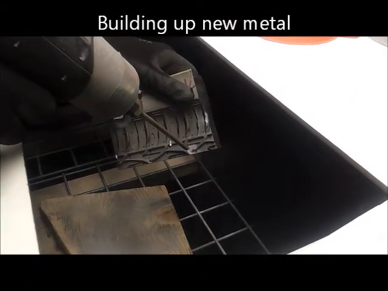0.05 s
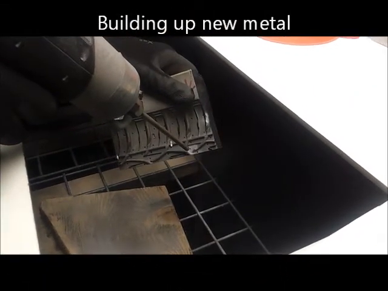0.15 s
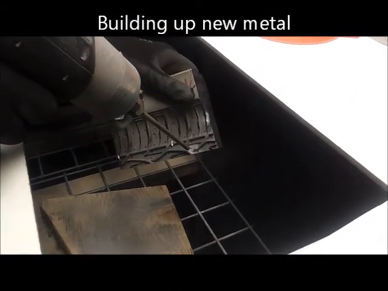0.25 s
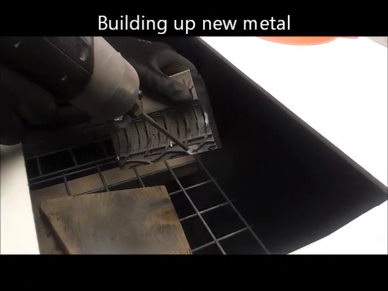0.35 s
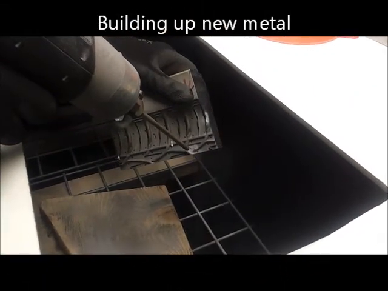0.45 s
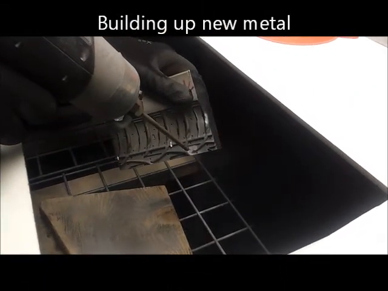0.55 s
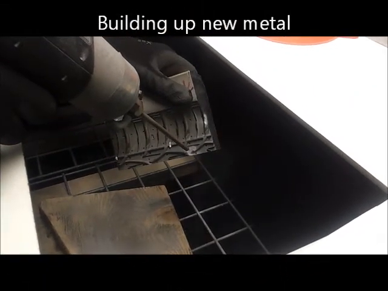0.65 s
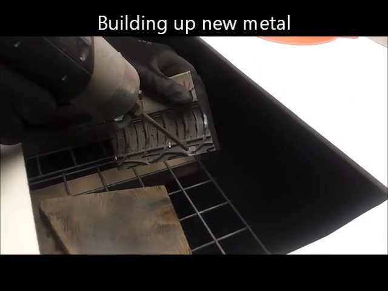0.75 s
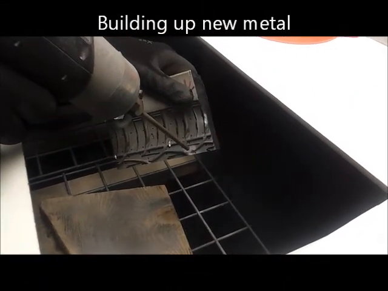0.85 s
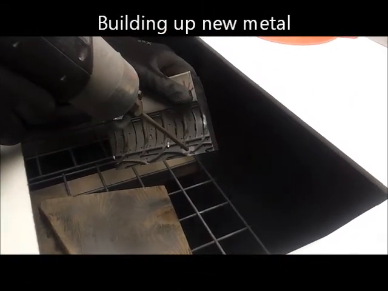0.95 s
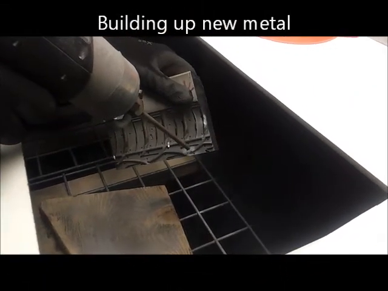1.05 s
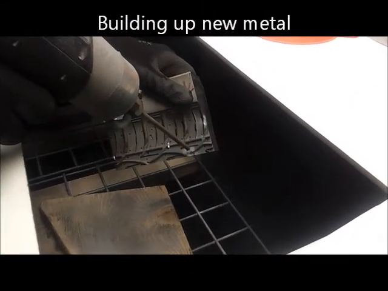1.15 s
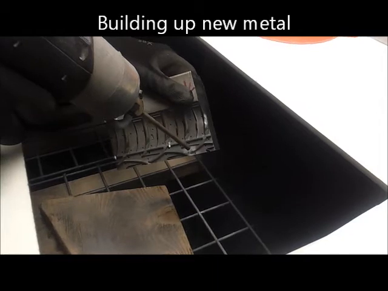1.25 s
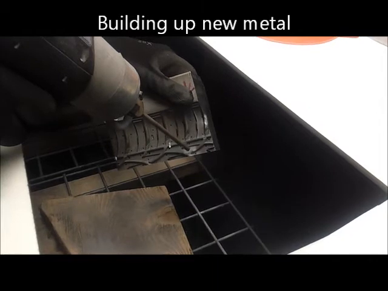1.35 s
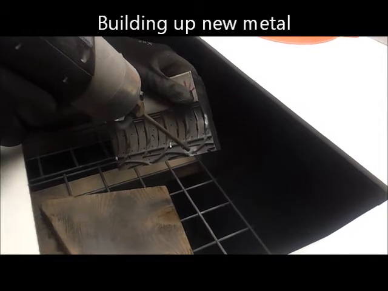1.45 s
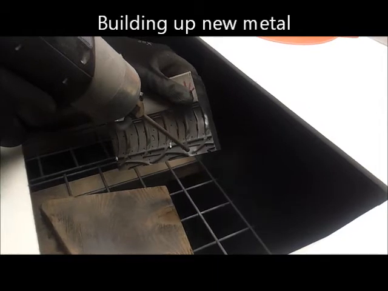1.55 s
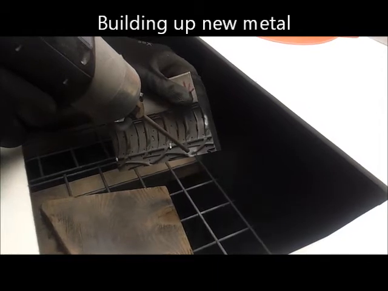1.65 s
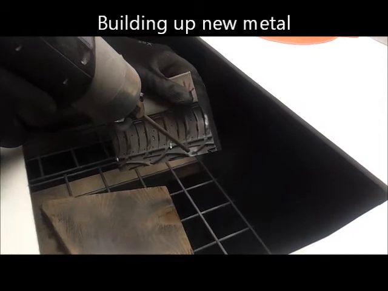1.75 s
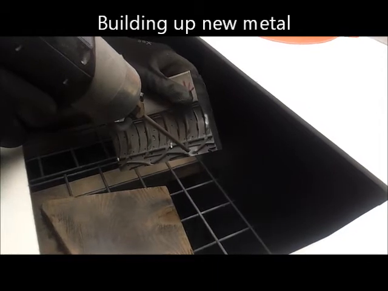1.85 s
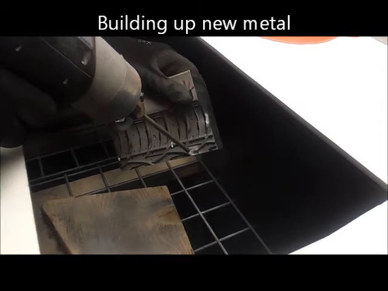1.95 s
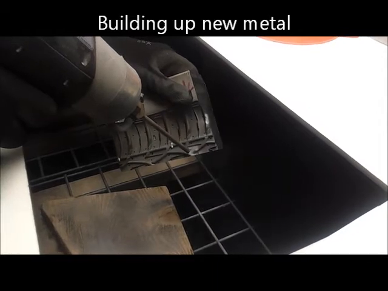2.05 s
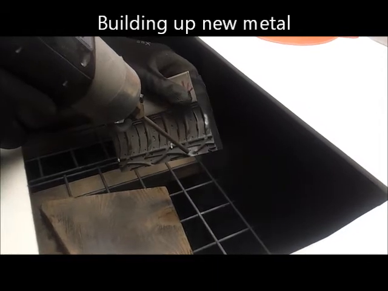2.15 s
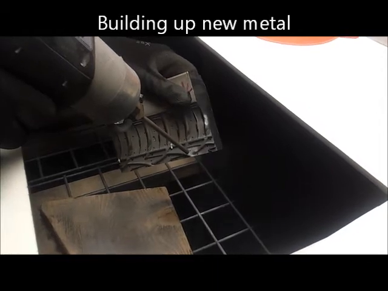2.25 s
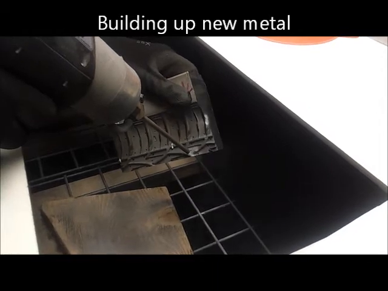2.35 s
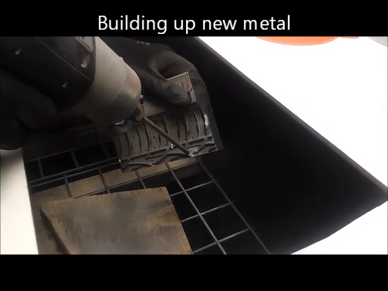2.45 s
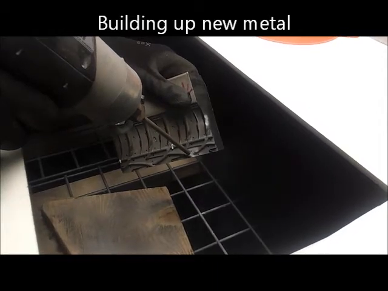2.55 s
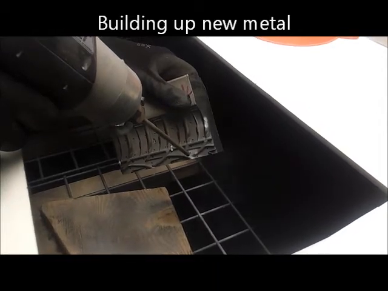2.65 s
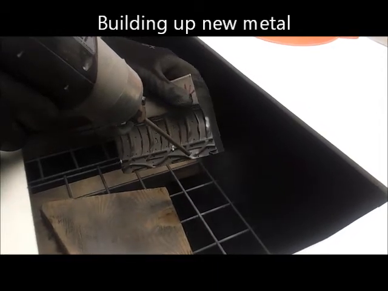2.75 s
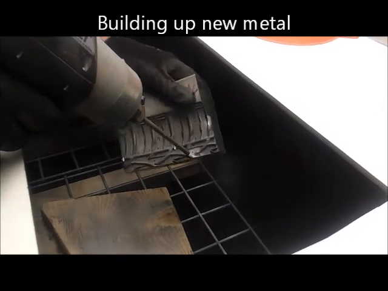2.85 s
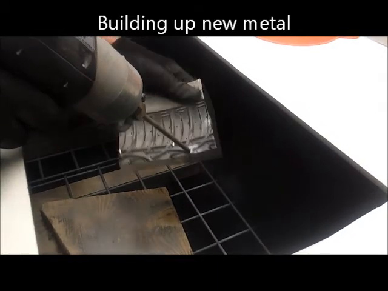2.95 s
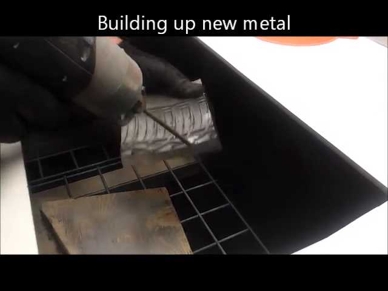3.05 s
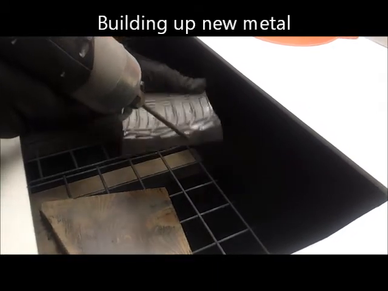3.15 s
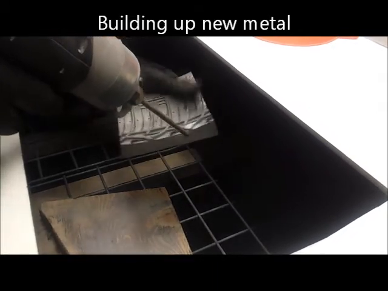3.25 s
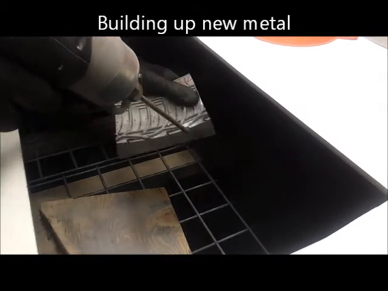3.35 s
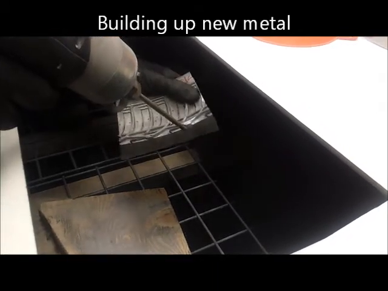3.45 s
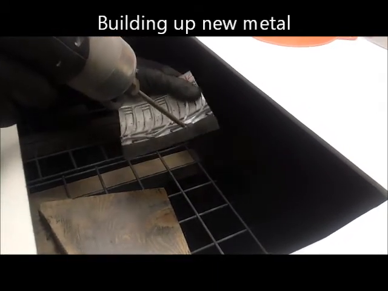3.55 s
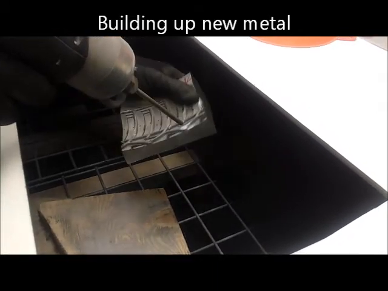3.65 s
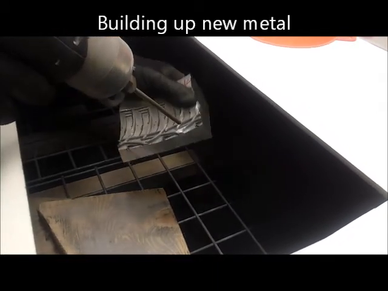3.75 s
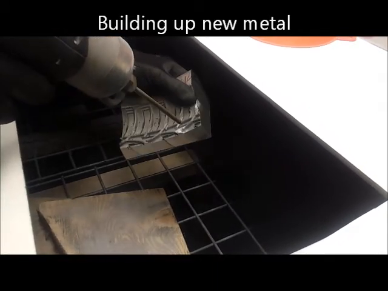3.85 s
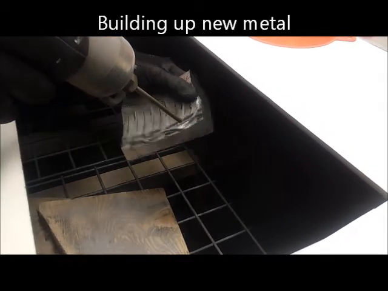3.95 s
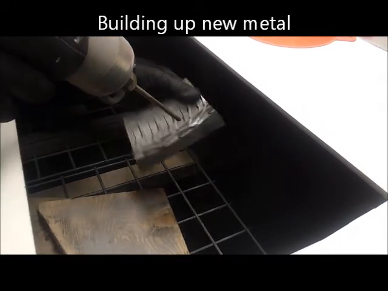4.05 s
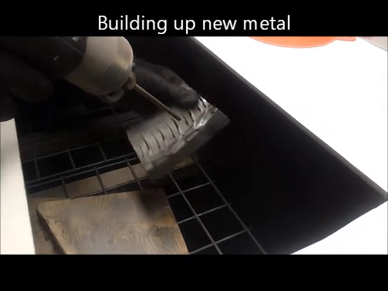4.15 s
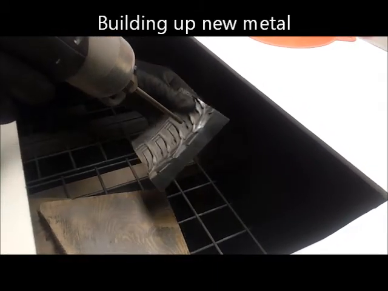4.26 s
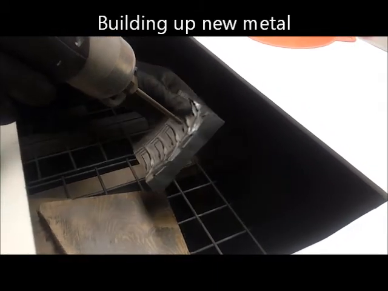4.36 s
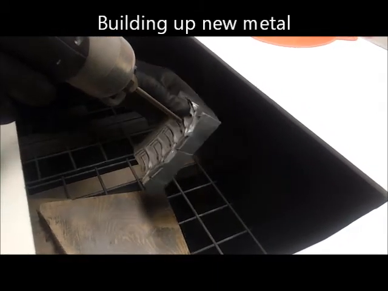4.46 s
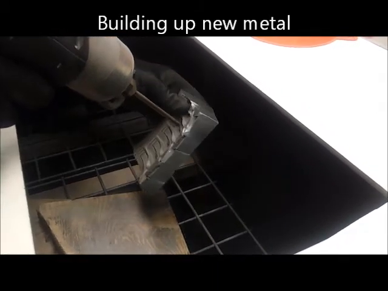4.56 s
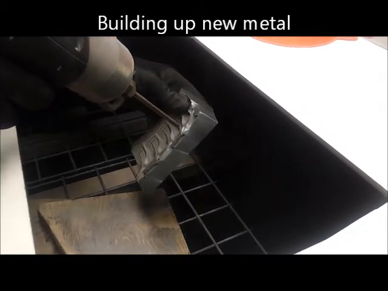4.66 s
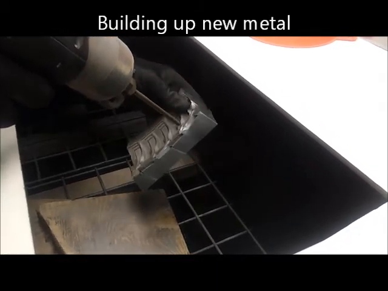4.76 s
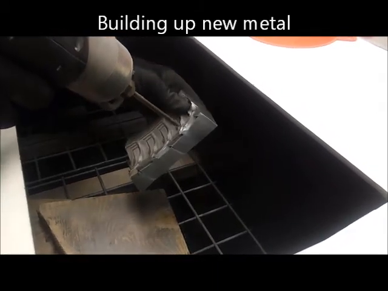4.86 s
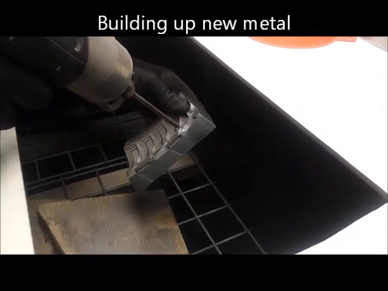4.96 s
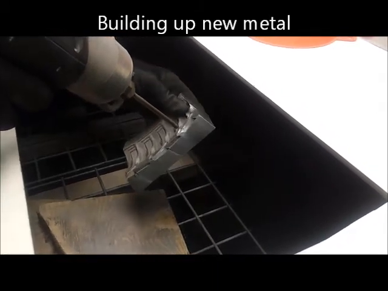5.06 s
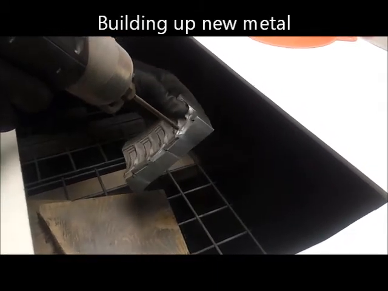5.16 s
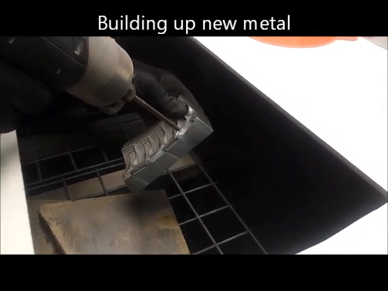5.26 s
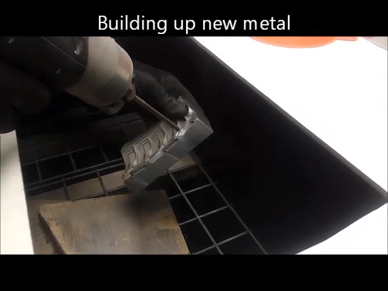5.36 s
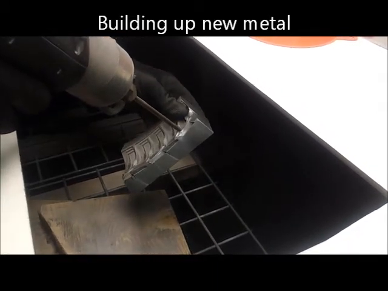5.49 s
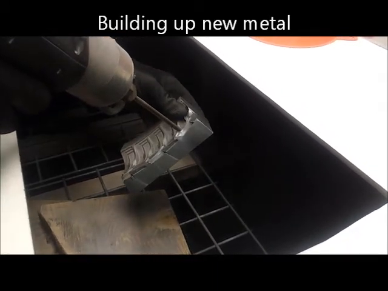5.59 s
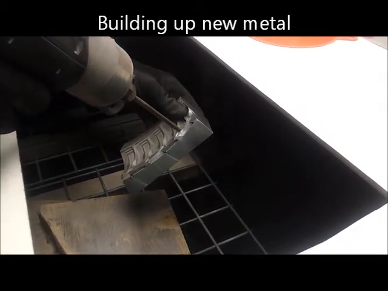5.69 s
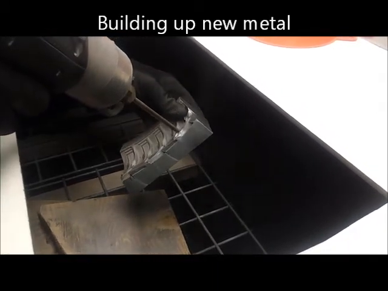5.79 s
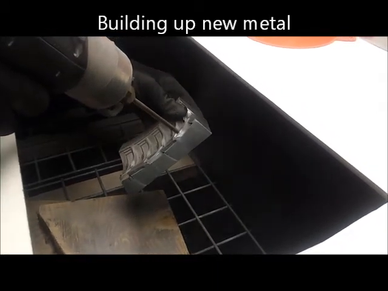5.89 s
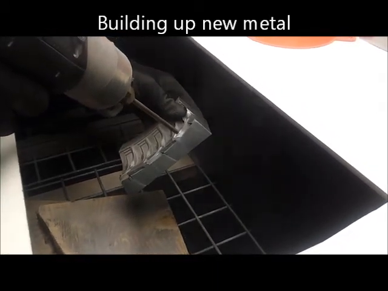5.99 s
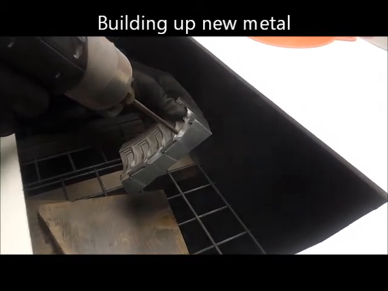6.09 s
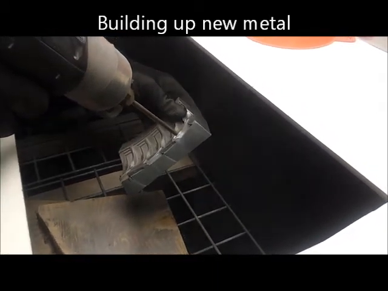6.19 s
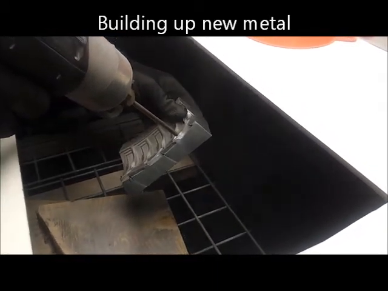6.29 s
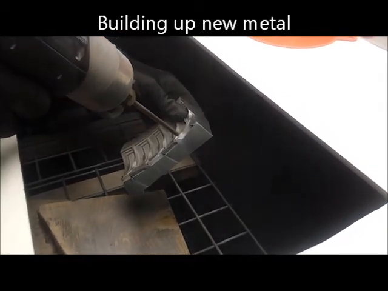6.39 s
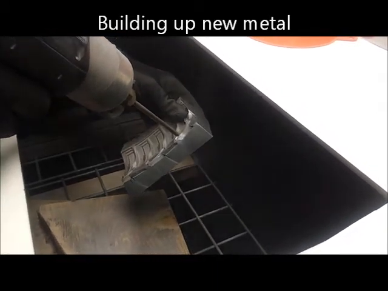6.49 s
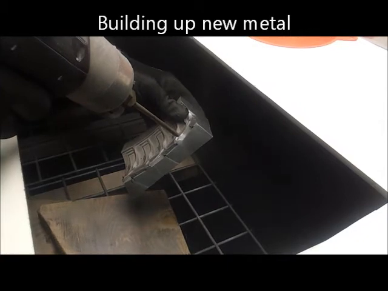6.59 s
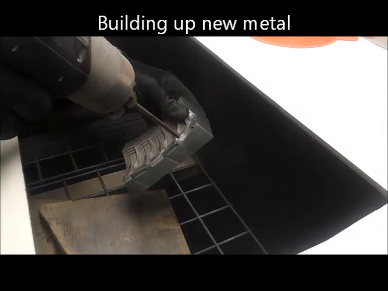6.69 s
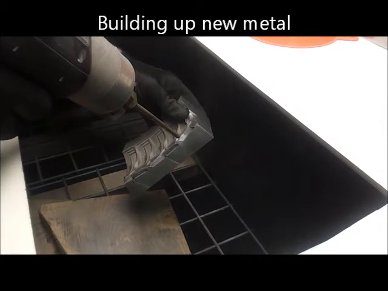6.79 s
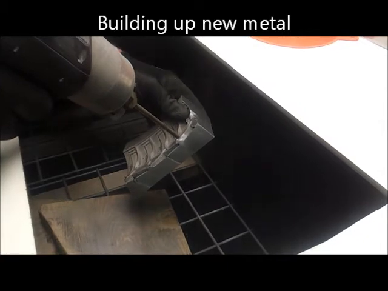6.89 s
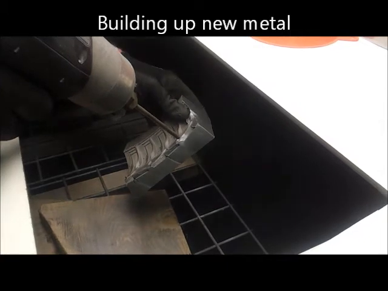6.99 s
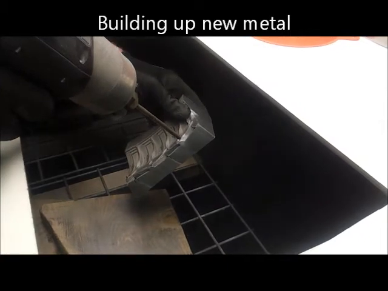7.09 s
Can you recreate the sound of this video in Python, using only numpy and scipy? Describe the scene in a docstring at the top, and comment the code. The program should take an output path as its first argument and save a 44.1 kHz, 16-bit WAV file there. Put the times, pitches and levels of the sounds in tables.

```python
"""Spray gun in a sheet-metal booth

A handheld gun blasts a supersonic air jet at a metal part and overloads both microphone capsules.
The jet is banded stereo noise with whistles; on release it fades from the bass up to a chirp.
Throbbing shop noise through ducts is then heard while the part is turned and strikes a ringing grating.
The valve snaps, short noise bursts, and the jet returns as a spurt, an overshoot and a steady blast."""
import sys
import numpy as np
from scipy import signal
from scipy.fft import rfft, irfft, next_fast_len
from scipy.io import wavfile

SR = 44100
rng = np.random.default_rng(int(sys.argv[2]) if len(sys.argv) > 2 else 0)


def wrap_up_sound(samples):
    """Save the sound to the file named by the first command line argument, as 16-bit audio."""
    columns = np.atleast_2d(samples).T
    # keep every value between -1 and 1, then stretch to whole-number steps
    tamed = np.clip(columns, -1, 1)
    steps = np.round(tamed * 32767).astype(np.int16)
    wavfile.write(sys.argv[1], SR, steps)


N = 314433
T = np.arange(N) / SR   # time [s]
SIZE = next_fast_len(N)
HZ = np.maximum(np.arange(SIZE // 2 + 1) * SR / SIZE, 1)   # bin frequencies, kept above zero for logarithms

# Bands of the jet: (low edge [Hz], high edge [Hz])
JET_BANDS = [(250, 600), (700, 1400), (1500, 3000), (4000, 6000), (6200, 7800), (9000, 14000)]
# Left-right lean of each jet band once the overload has eased: (level difference [dB])
EASED_PAN_DB = [-10, -6, -0.5, -4.5, -2, 18]
# Jet spectrum, each capsule behind its own resonant port:
# (frequency [Hz], left density [dB], right density [dB], likeness of the ports [-1..1])
JET_COLOUR = [(25, -27, -31, 0.), (160, -36, -62, 0.), (249, 1, -10.5, 0.24), (428, 4.5, -0.5, 0.046),
              (2190, -6, -7.5, 0.0093), (4340, -3, -2.5, 0.0086), (5040, -4.5, 2.5, 0),
              (5850, -3.5, -2.5, .05), (6450, -10.5, -4, 0.28), (8140, -0.5, -1.8, 0.0013),
              (9950, -1, 1.1, 0.22), (10270, 5.5, -1.5, 0.26), (11950, 6.5, 1.5, 0.31), (13200, 4, 4, 0.39),
              (15800, -10.5, -8, 0.52)]
# Whistles of nozzle and part, before and after the part is tilted:
# (frequency [Hz], width [Hz], left rise [dB], right rise [dB])
WHISTLES_FLAT = [(4450, 90, .5, 4), (5170, 70, .5, 3), (5350, 60, .5, 4), (8750, 200, 4, .5),
                 (10250, 120, 2.5, .5), (10750, 320, 2.5, .6), (11250, 150, -4, .5), (11550, 150, 2.5, 1.5),
                 (11900, 250, 4, 3), (12900, 150, 2.5, 1.5)]
WHISTLES_TILTED = [(4590, 160, -2, 3.7), (4960, 200, -1, 1.7), (5430, 200, 1, 1.7), (8130, 150, -1, 4.4),
                   (8470, 150, 3.5, .5), (10400, 50, -9, .5), (11000, 320, -2.5, 3.9),
                   (11450, 200, 0.5, .5), (12000, 230, 0, 1.5), (13900, 170, 5.5, 1.5)]
# Narrow whistles that come and go: (frequency [Hz], width [Hz], left re hiss [dB], right re hiss [dB])
FLUTTERS = [(4470, 120, -34, -21), (5340, 90, -32, -19), (10800, 260, -14, -24), (11400, 160, -18, -21),
            (12000, 260, -12, -17)]
# Roar, growl, body, howl and hiss of the jet; all levels after the first are relative to it:
# (steady level [dB], step on release [dB], hold after release [s], further loss when the valve seats [dB],
#  spurt [dB], overshoot at full flow [dB], settling time constant [s], second blast [dB])
JET_VOICES = [(-29, -6, 0.055, 42, -17, -12, 0.044, 0.6), (-24, -1.5, 0.16, 18.5, -10, -2, .06, 0.4),
              (-20, -0.3, 0.18, 19.5, -7, 0, .06, .1), (-17.5, 0.6, .18, 15.5, -3, 5.5, 0.18, 0.1),
              (-12, 2.1, .48, 15.5, -4, 11, 0.055, .1)]
# Bands of the shop noise: (low edge [Hz], high edge [Hz])
SHOP_BANDS = [(200, 1600), (2000, 5500), (8000, 14000)]
# Shop spectrum: (frequency [Hz], left density [dB], right density [dB], likeness of the ports [-1..1])
SHOP_COLOUR = [(25, -6, -19, -0.49), (113, -14, -16, -0.69), (151, -8, -11.5, -0.85),
               (290, -3.5, -9.5, -0.76), (630, -4.5, -3, -0.47), (1040, -9.5, -9.5, -0.29),
               (1360, -11, -12, 0.33), (3050, -17.5, -13, -0.035), (5300, -28, -18, -0.12),
               (6450, -32, -31, -0.061), (8650, -25, -34, 0.), (10700, -22.5, -40, 0.),
               (13300, -28.5, -45, 0.), (14600, -45, -51, 0.)]
# Duct resonances: (frequency [Hz], width [Hz], left rise [dB], right rise [dB])
DUCTS = [(147, 9.7, 7.5, 4), (192, 8.9, 4.5, 4), (297, 12, 9, 13), (376, 44, -6, -4.5), (460, 14, 2.5, 4.5),
         (503, 14, 4, 4), (586, 27, 3.5, 5), (708, 30, -1, -6), (1220, 36, 6, 5.5), (1454, 84, 2, 8.5)]
# Rumble, clatter and air leak of the shop: (level [dB], sink under the jet [dB])
SHOP_VOICES = [(-25, 19), (-31.5, 14), (-33.5, 0)]
# Machine strokes that swell the shop noise: (time [s], swell [dB])
THROBS = [(3.34, 3), (3.46, 4), (3.62, 2), (3.78, 2.5), (3.91, 4), (4.05, 4), (4.2, -0.5), (4.36, 3),
          (4.5, -1), (4.65, 1), (4.74, 3.5)]
# Snaps and thuds of valve and grit:
# (time [s], level [dB], centre frequency [Hz], width [octaves], t60 [s], left minus right [dB])
SNAPS = [(3.258, -17, 11200, .6, .015, 14), (3.359, -14, 11300, .5, .018, 14),
         (3.376, -23, 11000, .6, .015, 14), (3.444, -22, 10900, .6, .035, 14),
         (4.898, -12, 11300, .7, .03, 9), (4.898, -11, 4700, .5, .04, -9), (4.926, -18, 90, 2.5, .14, 3),
         (2.43, -27, 190, .8, .12, 3)]
# Whistle of the closing valve: (time [s], level [dB], from [Hz], to [Hz], length [s])
CHIRP = (3.147, -11, 13200, 11000, .012)
# The part strikes the grating: (time [s], level [dB])
KNOCK = (3.6686, -1)
# Modes of the grating: (frequency [Hz], relative level [dB], t60 [s])
GRATING = [(730, -10, .1), (870, -5, .08), (1007, 4, .06), (1120, -13, 0.056), (1190, -8, .4),
           (1220, -6, 0.5), (1280, -3, 0.29), (1337, 7, 0.092), (1440, -12, .07), (1800, 9, 0.039),
           (1960, -4, .06), (2640, -4, 0.058), (3000, -3, 0.045), (4380, -3, 0.034)]
# Reverberant tail of the booth: (centre frequency [Hz], relative level [dB], t60 [s])
KNOCK_TAIL = [(300, -29, .25), (705, -10, 0.29), (1210, -2, 0.5), (1990, -3.5, 0.32), (3480, -2, 0.2),
              (5500, -14, 0.12), (10000, -22, .07)]

# Trigger let go, valve seats, valve cracks open, full flow
RELEASE_S, SHUT_S, SPURT_S, OPEN_S = 2.448, 3.17, 4.905, 4.924
STEP_S, SHUT_DB_PER_S = 0.035, 260
FADE_BEND = 1.76   # the loss in dB quickens as this power of time
SPURT_RISE_S, SPURT_GROWS_DB = 0.0057, 1
SECOND_SAG_DB_PER_S = 0.08   # the second blast weakens slowly
JET_LAG_S = 0.0001278   # the jet noise reaches the left port later

# Easing of the overload (shares 0-1): a little on release, fully as the hiss dies, less at full flow
EASE_RELEASED, EASE_FROM_S, EASE_OVER_S = 0.32, 2.91, 0.16
EASE_SPURT, EASE_TILTED, SETTLE_S = 0.6, 0.11, 0.06

SHOP_RETURNS_S, SHOP_RETURN_OVER_S, SHOP_SINKS_S, SHOP_SINK_OVER_S = 3.027, 0.2, 4.96, 0.25
SHOP_HUSH_DB = 4.5   # it sinks further while the pressure bleeds away
THROB_RISE_S, THROB_FALL_S = 0.027, 0.05   # bell-curve widths before and after each stroke
LOW_CUT_HZ, CUTOFF_HZ = 143, 14560


def from_db(db):
    """Logarithmic level: decibels to amplitude gain."""
    return 10 ** (np.asarray(db) / 20)


def ramp(start_s, over_s):
    """Linear transition: 0 before the start, rising straight to 1."""
    return np.clip((T - start_s) / over_s, 0, 1)


def at_hz(rows):
    """Interpolation on log frequency: columns of a spectrum table at every frequency bin."""
    hz, *columns = np.transpose(rows)
    return np.array([np.interp(np.log(HZ), np.log(hz), column) for column in columns])


def drift(rate_hz):
    """Low-passed white noise: a slow random fluctuation of spread 1."""
    pole = np.exp(-80 * np.pi * rate_hz / SR)   # one value every 40 samples
    white = rng.standard_normal(N // 40 + 2002)
    slow = signal.lfilter([1], [1, -2 * pole, pole * pole], white)[2000:]   # drop the filter's start
    return np.interp(np.arange(N) / 40, np.arange(len(slow)), slow / slow.std())


def stereo_noise(colour, resonances, lag_s):
    """Partial coherence: two-channel noise spectrum mixed from a common and an opposed part."""
    left_db, right_db, likeness = at_hz(colour)
    density_db = np.array([left_db, right_db])
    for hz, width_hz, *rise_db in resonances:
        bell = 1 / (1 + (2 * (HZ - hz) / width_hz) ** 2)
        density_db = density_db + np.outer(rise_db, bell)
    mid, side = rfft(rng.standard_normal((2, SIZE)))
    likeness = np.clip(likeness, -1, 1)
    common = np.sqrt(1 + likeness) * mid
    opposed = np.sqrt(1 - likeness) * side * [[1], [-1]]
    left_delay = np.exp(-2j * np.pi * HZ * lag_s * [[1], [0]])
    return from_db(density_db) * (common + opposed) * left_delay


def played(spectrum, bands, levels_db, patchy_db):
    """Band synthesis: crossfading spectral slices follow their own levels and flicker independently."""
    power = np.abs(spectrum.mean(axis=0)) ** 2
    centres_hz = np.sqrt(np.prod(bands, axis=1))
    shares = at_hz(np.column_stack([centres_hz, np.eye(len(bands))]))
    out = 0
    for (low, high), share, level_db in zip(bands, shares, levels_db):
        in_band = (HZ > low) & (HZ < high)
        rms = np.sqrt(2 * power[in_band].sum()) / SIZE
        slice_noise = irfft(spectrum * share, SIZE)[:, :N] / rms
        out = out + slice_noise * from_db(level_db + patchy_db * drift(8.5))
    return out


def burst(start_s, hz, octaves, t60):
    """Exponential decay: two-channel band noise that starts at once and is cut after half a second."""
    start, size = round(start_s * SR), SR // 2
    edges = [hz / 2 ** (octaves / 2), hz * 2 ** (octaves / 2)]
    band = signal.butter(2, edges, "band", fs=SR, output="sos")
    noise = signal.sosfilt(band, rng.standard_normal((2, size)))
    dying = noise / noise.std() * from_db(-60 * T[:size] / t60)
    return np.pad(dying, [(0, 0), (start, N - start - size)])


def jet_levels():
    """Pressure discharge: voices fade from the bass up, then return as a spurt and settling overshoot."""
    since_open = np.maximum(T - OPEN_S, 0)
    levels_db = []
    for steady_db, step_db, hold_s, lost_db, spurt_db, over_db, settle_s, second_db in JET_VOICES:
        fade_start_s = RELEASE_S + hold_s
        faded = np.maximum(T - fade_start_s, 0) / (SHUT_S - fade_start_s)
        dying = step_db * ramp(RELEASE_S, STEP_S) - lost_db * faded ** FADE_BEND
        dying = dying - SHUT_DB_PER_S * np.maximum(T - SHUT_S, 0)
        spurt = spurt_db - SPURT_GROWS_DB * (1 - ramp(SPURT_S, OPEN_S - SPURT_S))
        spurt = spurt - 40 * (1 - ramp(SPURT_S, SPURT_RISE_S))
        flowing = second_db + over_db * np.exp(-since_open / settle_s) - SECOND_SAG_DB_PER_S * since_open
        opening = np.where(T < OPEN_S, spurt, flowing)
        levels_db.append(steady_db + np.where(T < SPURT_S, np.maximum(dying, -80), opening))
    easing = EASE_RELEASED * ramp(RELEASE_S, STEP_S)
    easing = easing + (1 - EASE_RELEASED) * ramp(EASE_FROM_S, EASE_OVER_S)
    returning = EASE_TILTED + EASE_SPURT * np.exp(-since_open / SETTLE_S)
    return *levels_db, np.where(T < SPURT_S, easing, returning)


def flutter(hiss_db):
    """Resonant filtering: noise passes each narrow resonance twice and swells at random."""
    out = 0
    for hz, width_hz, *ports_db in FLUTTERS:
        radius = np.exp(-np.pi * width_hz / SR)
        poles = [1, -2 * radius * np.cos(2 * np.pi * hz / SR), radius * radius]
        once = signal.lfilter([1], poles, rng.standard_normal(N))
        tone = signal.lfilter([1], poles, once)
        swelling = tone / tone.std() * from_db(hiss_db + 5.8 * drift(2.3))
        out = out + np.outer(from_db(ports_db) * [1, -1], swelling)   # opposite in phase at the ports
    return out


def jet():
    """Jet turbulence: broadband noise with whistles, which shift once the part is tilted."""
    roar_db, growl_db, body_db, howl_db, hiss_db, eased = jet_levels()
    # between the port resonances mostly overload noise is left
    valley_db = 0.59 * body_db + 0.53 * hiss_db - 3.5
    bands_db = (roar_db, growl_db, body_db, howl_db, valley_db, hiss_db)
    lean = np.array([[.3], [-1.7]])   # easing moves the right port most
    levels_db = [db + eased * pan_db / 2 * lean for db, pan_db in zip(bands_db, EASED_PAN_DB)]
    first, second = (played(stereo_noise(JET_COLOUR, whistles, JET_LAG_S), JET_BANDS, levels_db, patchy_db=0.9)
                     for whistles in (WHISTLES_FLAT, WHISTLES_TILTED))
    return np.where(T < 4, first, second) + flutter(hiss_db)   # exchanged between the blasts


def shop_levels():
    """Level contrast: the shop is heard in full only between the blasts."""
    back = ramp(SHOP_RETURNS_S, SHOP_RETURN_OVER_S)
    sunk = 1 - back + ramp(SHOP_SINKS_S, SHOP_SINK_OVER_S)
    hush_db = SHOP_HUSH_DB * ramp(RELEASE_S, STEP_S) * (1 - back)
    return [db - sink_db * sunk - hush_db for db, sink_db in SHOP_VOICES]


def shop():
    """Duct resonance: throbbing fan and machine noise, mostly opposite in phase at the ports in the bass."""
    swell_db = 0
    for stroke_s, db in THROBS:
        away = np.where(T < stroke_s, (stroke_s - T) / THROB_RISE_S, (T - stroke_s) / THROB_FALL_S)
        swell_db = swell_db + db * np.exp(-away ** 2)
    levels_db = [db + share * swell_db for db, share in zip(shop_levels(), (1, .9, .7))]
    return played(stereo_noise(SHOP_COLOUR, DUCTS, lag_s=0), SHOP_BANDS, levels_db, patchy_db=1.2)


def snaps():
    """Impulsive excitation: short noise bursts, each leaning to the port that favours its pitch."""
    out = 0
    for start_s, db, hz, octaves, t60, pan_db in SNAPS:
        ports_db = db + pan_db / 2 * np.array([[1], [-1]])
        out = out + from_db(ports_db) * burst(start_s, hz, octaves, t60)
    return out


def chirp():
    """Gliding tone: the last air whistles down through the valve seat, mostly at the left port."""
    start_s, db, from_hz, to_hz, length_s = CHIRP
    part = ramp(start_s, length_s)
    turns = np.cumsum(from_hz + (to_hz - from_hz) * part) / SR
    ports_db = db + np.array([[4], [-12]])
    return from_db(ports_db) * np.sin(np.pi * part) * np.sin(2 * np.pi * turns)


def knock():
    """Modal impact: a blow rings the grating over a short crack; booth walls add a tail that dies by band."""
    start_s, level_db = KNOCK
    t = np.maximum(T - start_s, 0)
    modes = 0
    for k, (hz, db, t60) in enumerate(GRATING):
        modes = modes + (-1) ** k * from_db(db - 60 * t / t60) * np.sin(2 * np.pi * hz * t)
    tail = sum(from_db(db) * burst(start_s, hz, 0.65, t60) for hz, db, t60 in KNOCK_TAIL)
    # the part itself, damped by the glove
    thwack = from_db(3 - 60 * t / .025) * np.sin(2 * np.pi * 1150 * t)
    crack = from_db(-2) * burst(start_s, hz=4000, octaves=2.5, t60=.02).mean(axis=0)
    return from_db(level_db) * (from_db(-12.5) * modes + from_db(-9.0) * tail + thwack + crack)


def scene():
    """Superposition: all sources add at the two capsules."""
    return jet() + shop() + snaps() + chirp() + knock()


def record(dry):
    """Saturation and filtering: peaks flatten near full scale, then a gentle low cut and a steep top cut."""
    flat = dry / (1 + np.abs(dry / 1.05) ** 4) ** (1 / 4)
    low_cut = signal.butter(1, LOW_CUT_HZ, "high", fs=SR, output="sos")
    top_cut = signal.ellip(12, .3, 80, CUTOFF_HZ, fs=SR, output="sos")
    return signal.sosfilt(top_cut, signal.sosfilt(low_cut, flat))


dry = scene()
out = record(dry)
wrap_up_sound(out)
```